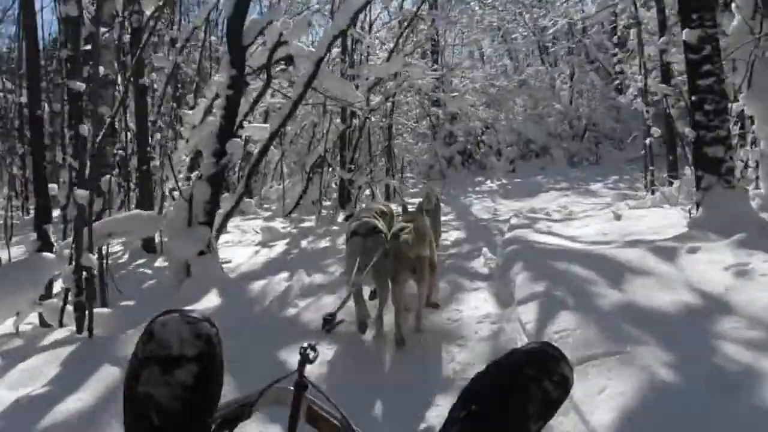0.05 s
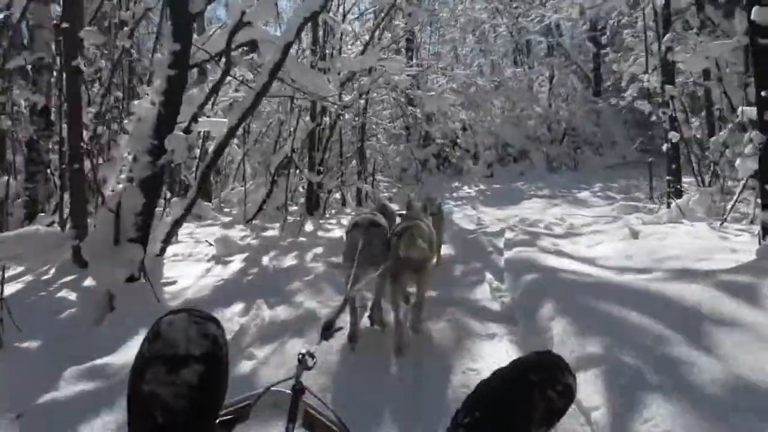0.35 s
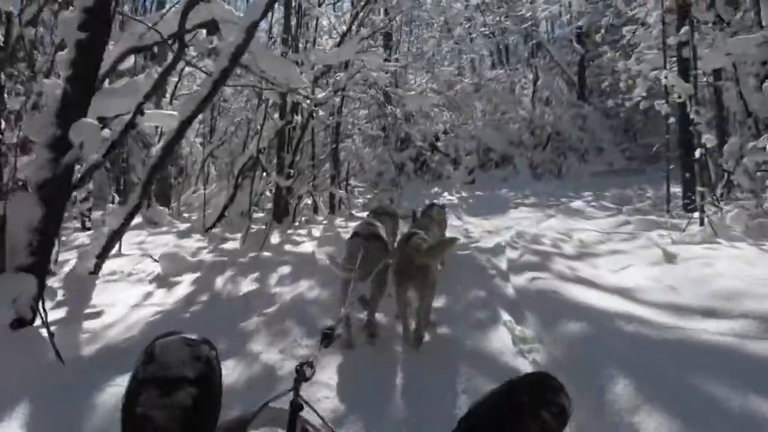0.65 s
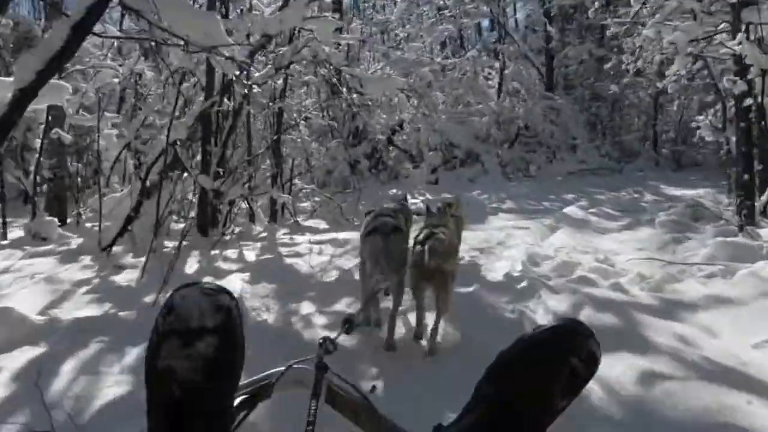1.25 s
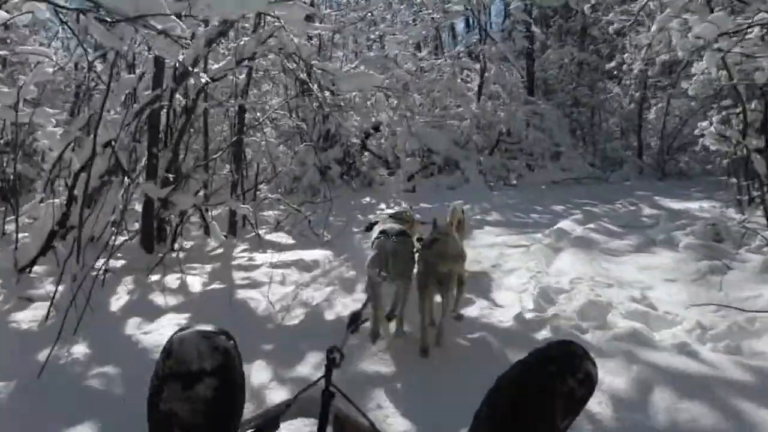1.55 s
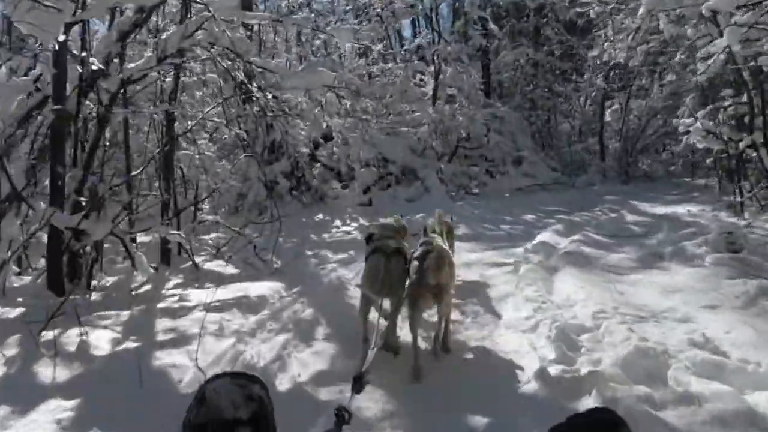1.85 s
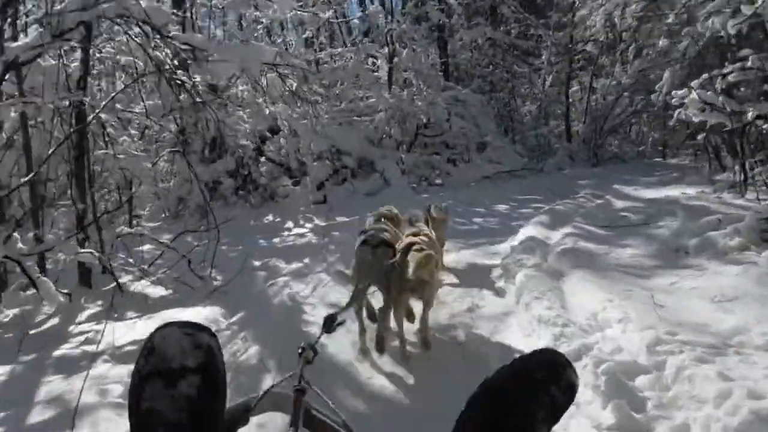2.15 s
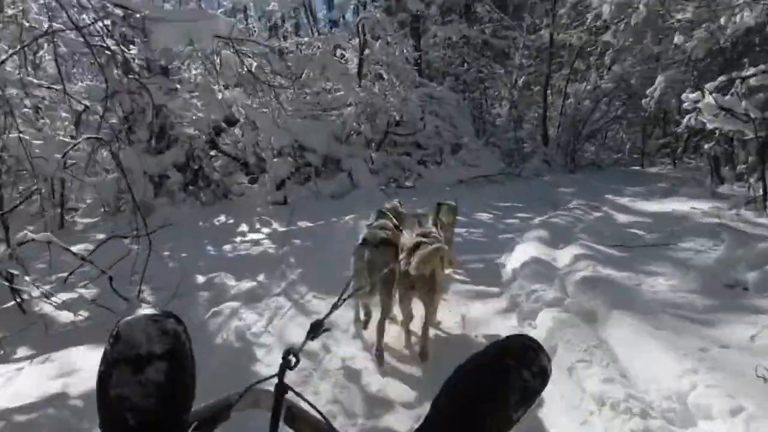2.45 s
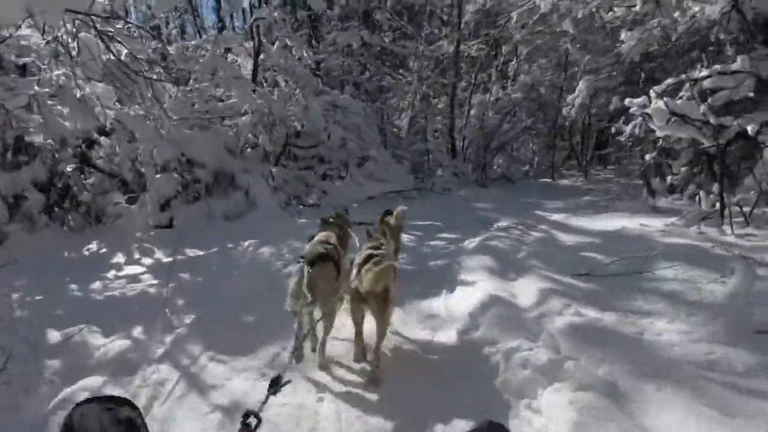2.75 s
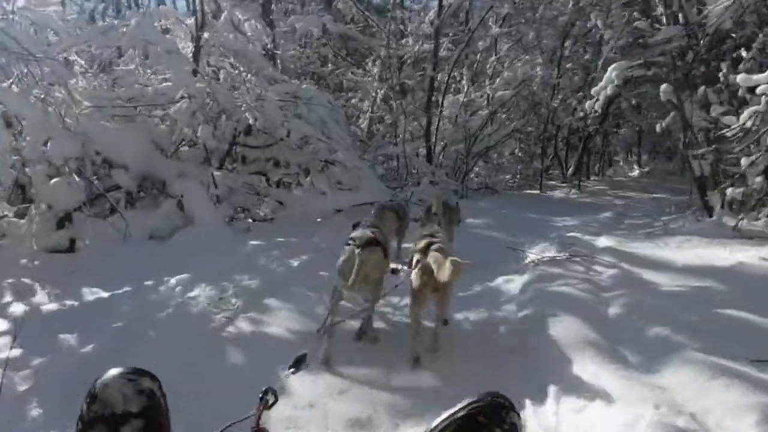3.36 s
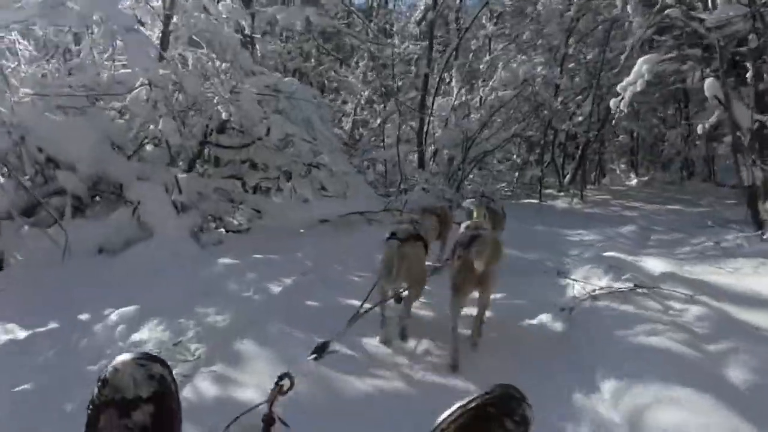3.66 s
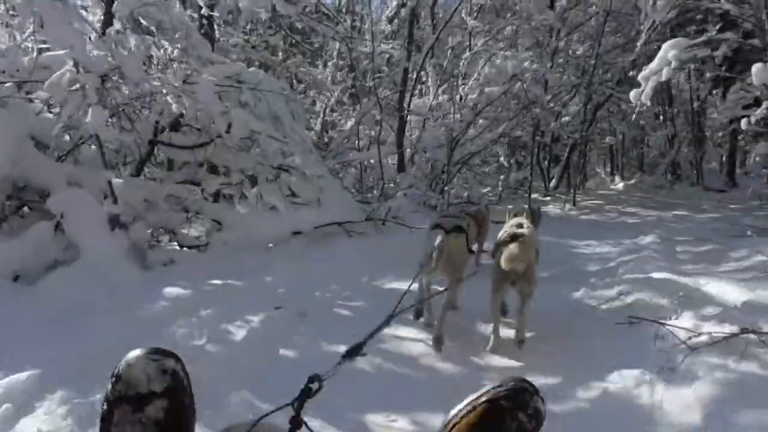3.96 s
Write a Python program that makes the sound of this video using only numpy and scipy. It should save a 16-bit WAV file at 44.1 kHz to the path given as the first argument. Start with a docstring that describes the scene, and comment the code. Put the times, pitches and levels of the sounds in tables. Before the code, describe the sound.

A sled hisses and crunches over snow, its frame knocking and rattling over bumps.

```python
"""A dog sled runs along a snowy forest trail, heard close up from a camera riding on it.
The runners hiss, crunch and faintly squeak in the snow just below. The frame knocks and judders over
the bumps, and a metal clip on the tow line clinks. Low jolts and rumble of the ride reach the
microphone, and the hardest knocks overload it."""
import sys
import numpy as np
from scipy import signal
from scipy.fft import rfft, irfft
from scipy.io import wavfile
from scipy.ndimage import uniform_filter1d

SR = 44100
rng = np.random.default_rng(int(sys.argv[2]) if len(sys.argv) > 2 else 0)


def store_pcm(level_fs):
    """Save levels as 16-bit WAV."""
    pcm = np.round(np.clip(level_fs, -1, 1) * 32767).astype(np.int16)
    wavfile.write(sys.argv[1], SR, np.atleast_2d(pcm).T)


N = 176400
TIME = np.arange(N) / SR

# Pressure of the runners on the snow. Each row: time in seconds, hiss in dB, scrape in dB.
RUNNER_PRESSURE = [(0, -20.5, -29), (0.17, -20.5, -30.5), (0.24, -20.5, -35.5), (0.38, -22.5, -33),
                   (0.53, -23, -33.5), (0.61, -24, -32.5), (0.68, -19.5, -29.9), (0.75, -19.5, -29.2),
                   (0.87, -21.5, -30), (0.95, -21.5, -26.5), (1.1, -22.5, -29.5), (1.19, -19.5, -28.5),
                   (1.28, -22.5, -28.5), (1.405, -19, -44), (1.44, -29, -34), (1.47, -26.5, -32),
                   (1.51, -20.5, -30.6), (1.545, -18.5, -28.8), (1.585, -26, -32), (1.61, -17.6, -21),
                   (1.645, -26.2, -31.5), (1.695, -19.5, -35.5), (1.735, -10.5, -25), (1.83, -12, -19),
                   (1.875, -20.5, -25), (1.92, -16, -26.5), (1.98, -18, -27.5), (2.1, -14.5, -22.5),
                   (2.19, -18.2, -27), (2.3, -16.7, -21.5), (2.4, -19, -31), (2.45, -22.5, -36.5),
                   (2.55, -25.5, -31), (2.6, -27.5, -35), (2.645, -24.5, -38), (2.675, -26.5, -34),
                   (2.71, -18, -30.7), (2.735, -26.5, -31), (2.77, -12, -26), (2.825, -16.3, -24.9),
                   (2.86, -19.5, -29.4), (2.91, -19.6, -28), (2.98, -18.5, -28), (3.1, -19.5, -30),
                   (3.18, -20.5, -28.5), (3.29, -24.5, -35.5), (3.35, -23.7, -31), (3.44, -22.0, -25.5),
                   (3.51, -21.5, -26), (3.55, -25, -31.5), (3.68, -24.5, -32.5), (3.72, -25.5, -34.5),
                   (3.86, -25.0, -31), (3.92, -22.5, -29.5), (4.0, -19, -26)]
# Rumble at the microphone. Each row: time in seconds, level in dB.
RUMBLE_LEVELS = [(0, -39), (0.06, -32.9), (0.12, -40), (0.35, -42.7), (0.6, -48), (0.75, -34.0),
                 (1.08, -36.5), (1.25, -29), (1.38, -41), (1.6, -30), (1.7, -36), (1.8, -29.4), (1.95, -29),
                 (2.3, -33.5), (2.55, -39.5), (2.7, -35), (2.8, -30), (2.93, -25), (3.0, -34.5), (3.1, -32),
                 (3.2, -37.5), (3.47, -34), (3.6, -48), (3.66, -28), (3.8, -31), (4.0, -24.5)]
# Soft jolts of the sled. Each row: crest time in seconds, level in dB, pitch in Hz.
SLED_JOLTS = [(0.039, -25, 80), (.665, -17.5, 79), (1.126, -16.5, 110), (1.179, -3, 157), (1.246, -13, 156),
              (1.46, -18, 202), (1.575, -16, 150), (1.632, -7.5, 66), (1.641, -2, 135), (1.912, -11, 113),
              (2.21, -13.5, 210), (2.254, -17.5, 209), (2.635, -8, 120), (2.743, -11.5, 192),
              (2.934, -17.5, 99), (3.111, -15, 198), (3.646, -19, 100), (3.685, -19.5, 91),
              (3.718, -12, 119), (3.741, -15, 190), (3.964, -13.5, 75)]
# Knocks of the frame. Each row: start in seconds, level in dB, contact in seconds, extra body in dB.
FRAME_KNOCKS = [(0.05, -14.5, 0.0072, 0), (0.079, -21, 0.0019, -1), (0.105, -14, 0.0055, -5),
                (0.154, -11, 0.007, -7), (0.163, -12.5, 0.003, -1), (0.198, -15.5, 0.0048, 0),
                (0.26, -0.5, 0.0035, -3), (0.267, -6.5, 0.0033, -3), (0.2755, -6, 0.0026, 6),
                (0.291, -10, 0.0039, 4.5), (0.304, -28, 0.0023, -8), (0.3235, -4.5, 0.0034, 4.5),
                (0.346, -14.5, 0.0045, -5), (0.407, -16, 0.0028, -6), (0.566, -22, 0.0029, 2),
                (0.622, -20, 0.0076, -4), (0.6365, -6.5, 0.0044, -2.5), (0.649, -9.5, 0.0027, -8),
                (0.722, -4, 0.002, 3), (0.736, -14, 0.0091, 1), (0.892, -16, 0.0037, 0),
                (0.91, -9, 0.0021, 2), (0.975, -9, 0.0026, 9), (1.004, -17.5, 0.0036, 3),
                (1.075, -14, 0.0032, -3), (1.164, -11.5, 0.0037, -11), (1.17, -12, 0.0043, 1),
                (1.242, -10.5, 0.004, -7), (1.325, -13, 0.0028, -14), (1.403, -26, 0.0039, -20),
                (1.414, -10.5, 0.0043, -3), (1.5205, 1.5, 0.0024, -3.5), (1.563, -10, 0.0015, 1),
                (1.572, -11, 0.0029, -6), (1.5905, -1, 0.0029, -1.5), (1.606, -13, 0.0022, -2),
                (1.621, -5.5, 0.0014, -14), (1.716, -10, 0.0031, 2), (1.83, 3, 0.0039, 4.5),
                (1.847, -11, 0.0026, -3), (1.861, -6, 0.003, -8), (1.8925, 5, 0.0051, 2),
                (1.95, -3.5, 0.0043, -17), (1.958, -6.5, 0.0031, -7), (1.995, -8.5, 0.0022, -15),
                (2.036, -12, 0.003, -3), (2.083, -9.5, 0.0023, 1), (2.098, -7, 0.0027, 4),
                (2.135, -11.5, 0.0037, 0), (2.214, -12, 0.0022, -10), (2.273, -8, 0.0032, 6),
                (2.358, -10, 0.0032, 2), (2.3665, -6, 0.005, 7.5), (2.397, -9, 0.0033, 2),
                (2.4155, -5.5, 0.0046, 9.5), (2.424, -11, 0.0039, -14), (2.465, -15, 0.0023, -2),
                (2.492, -13.5, 0.003, -2), (2.521, -11.5, 0.0026, -12), (2.546, -12, 0.0022, -11),
                (2.56, -5, 0.0049, 9.5), (2.613, -10.5, 0.003, -5), (2.742, -10, 0.0071, -14),
                (2.7535, 0.5, 0.0037, 4), (2.779, 0, 0.0026, 0.5), (2.851, -10.5, 0.0027, -6),
                (2.89, -11, 0.0071, 2.5), (2.932, -10.5, 0.0059, 0.5), (3.01, -11.5, 0.0058, 9.5),
                (3.053, -11, 0.0062, 3.5), (3.065, 0.5, 0.0034, 6), (3.078, -4, 0.0066, -1),
                (3.216, -12, 0.0022, -11), (3.243, -25, 0.0036, -10), (3.27, -12, 0.0041, -11),
                (3.3, -11.5, 0.0032, -6), (3.37, -5, 0.0044, 7), (3.412, -11.5, 0.002, -21),
                (3.4705, -1.5, 0.0027, 3), (3.49, -13, 0.0018, 1), (3.56, -15.5, 0.0025, -1),
                (3.642, -14, 0.0017, -12), (3.672, -20, 0.0036, -13), (3.742, -15, 0.0048, -0.5),
                (3.814, -21, 0.0028, 0), (3.835, -12, 0.0017, -21), (3.899, -25, 0.0044, 16.5),
                (3.921, -15, 0.0046, 1)]
# Chatter over hard ridges. Each row: start and length in seconds, level in dB, extra body in dB.
FRAME_JUDDERS = [(1.74, .012, -3, 1), (1.752, .03, 2, 5), (1.7853, .036, 1.5, 3), (2.305, .036, -3.5, 8),
                 (2.7892, .02, 5.5, 0.5)]
# Clinks from the tow line. Each row: start in seconds, level in dB.
TOW_CLINKS = [(.637, -3.5), (.650, -8), (1.165, -17), (1.6215, -6), (1.995, -13), (2.7425, -11),
              (3.300, -22), (3.835, -20)]
# Modes of its metal clip. Each row: nominal pitch in Hz, level in dB, seconds to fade by 60 dB.
METAL_MODES = [(2730, -5, 0.026), (4650, -5, 0.045), (5220, 3, 0.027), (6030, 5, 0.018), (7250, -10, 0.02)]
# Squeaks on packed snow. Each row: start and length in seconds, pitch in Hz, level in dB, wobble in Hz.
SNOW_SQUEAKS = [(0.802, 0.064, 3420, -20.5, 230), (1.127, 0.027, 3780, -21, 200),
                (1.172, 0.057, 2750, -19, 400), (1.371, 0.019, 3200, -16, 80),
                (1.386, .018, 4210, -15, 200)]
# Tone of each layer at the microphone. Each row: frequency in Hz, relative level in dB.
HISS_SPECTRUM = [(200, -20.5), (1000, -14), (2500, -4.5), (4000, -0.5), (6200, 1), (7300, -2.5),
                 (9000, -6.5), (10500, -11.5), (12500, -23.5), (15500, -46.5)]
SCRAPE_SPECTRUM = [(100, -9.5), (300, -4), (550, -2.5), (900, 0.5), (1500, 1), (2300, -2.5), (3500, -3),
                   (7000, -34), (15000, -45)]
RUMBLE_SPECTRUM = [(10, -9), (25, 9.5), (45, 3.5), (62, 4), (110, 0), (200, -4.5), (350, -15.5), (800, -31),
                   (3000, -57)]
KNOCK_SPECTRUM = [(80, -18.5), (400, -9.5), (900, -9), (1600, -5.5), (3000, 0), (4500, 0), (6000, 0.5),
                  (7500, -3.5), (10000, -9), (12500, -21.5), (16000, -60)]
# Resonances of frame and camera housing. Each row: centre and width in Hz, lift in dB at body=1.
BODY_RESONANCES = [(755, 56, 5), (1070, 60, 1), (1475, 84, 4), (1638, 53, 3), (2040, 96, 2), (2130, 70, 2),
                   (2200, 60, 2), (2570, 73, 3), (3320, 70, 6.5), (3360, 120, -2), (4360, 140, 5),
                   (5370, 84, 2.5), (5770, 120, 5.5), (6400, 760, 1), (7830, 61, -4), (8780, 260, 1)]

HISS_DB, SCRAPE_DB, RUMBLE_DB, KNOCK_DB = -1, -2, -1, -1.3
CRUNCH_PER_S, CRUNCH_DB, CRUNCH_SPREAD_DB, CRUNCH_S = 120, -4, 1.5, 0.0027
JOLT_DECAY_CYCLES, JOLT_ROUGHNESS = 0.4, 0.2
JUDDER_GAP_S, JUDDER_CONTACT_S = 0.0079, 0.0026
ATTACK_S, RELEASE_S, SNAP_DB, SNAP_S = 0.00058, 0.0018, -2, 0.0011
RING_DB, RING_RISE_S, RING_S = -8, 0.0054, 0.0067
BODY_HZ, BODY_OCTAVES, TINT_DB, TINT_STEP_HZ = 1550, 0.85, 2, 451.5
SQUEAK_RISE, SQUEAK_OCTAVE_DB = 0.037, -6
CEILING, BAND_EDGE_HZ = 0.81, 15900


def amp(db):
    """Decibels to gain."""
    return 10 ** (np.asarray(db) / 20)


def unit(x):
    """Scales to rms 1."""
    return x / np.sqrt(np.mean(x ** 2) + 1e-20)


def add(mix, start, sound):
    """Mixes a sound in at a time in seconds."""
    part = mix[max(round(start * SR), 0):][:len(sound)]
    part += sound[:len(part)]


def colour(x, spectrum, body=0):
    """Causal filter of unit energy: a smooth spectrum plus a share of the body resonances."""
    size = 8192
    hz = np.abs(np.fft.fftfreq(size, 1 / SR))
    point_hz, point_db = np.transpose(spectrum)
    lifts = sum(lift / (1 + (2 * (hz - centre) / width) ** 2) for centre, width, lift in BODY_RESONANCES)
    db = np.interp(np.log(hz + 1), np.log(point_hz), point_db) + body * lifts
    minimum_phase = np.exp(np.conj(signal.hilbert(np.log(amp(db)))))
    taps = np.fft.ifft(minimum_phase).real[:size // 2]
    return signal.oaconvolve(x, taps / np.linalg.norm(taps))[:len(x)]


def wander(rate_hz):
    """Smooth random drift of rms 1."""
    hz = np.fft.rfftfreq(N, 1 / SR)
    return unit(irfft(rfft(rng.standard_normal(N)) * np.exp(-(hz / rate_hz) ** 2), N))


def snow_noise(patchy_db):
    """Noise whose colour shifts from moment to moment, as the snow changes under the runners."""
    cells = signal.stft(rng.standard_normal(N), nperseg=512)[2]
    bands = uniform_filter1d(rng.standard_normal(cells.shape), size=7, axis=0)
    patches = unit(uniform_filter1d(bands, size=5, axis=1))
    return unit(signal.istft(cells * amp(patchy_db * patches))[1][:N])


def runners():
    """Just below the microphone, fine snow hisses, crust crunches, and the frame carries the scrape."""
    times, hiss_db, scrape_db = np.transpose(RUNNER_PRESSURE)
    breaks = rng.random(N) < CRUNCH_PER_S / SR
    grains = breaks * amp(CRUNCH_SPREAD_DB * np.minimum(rng.exponential(1, N), 3))
    crunch = unit(np.sqrt(signal.lfilter([1], [1, -np.exp(-1 / (CRUNCH_S * SR))], grains ** 2)))
    grip = np.hypot(1, amp(CRUNCH_DB) * crunch) * amp(0.43 * wander(rate_hz=72))
    hiss = colour(grip * snow_noise(patchy_db=2), HISS_SPECTRUM, body=0.17)
    hiss *= amp(HISS_DB + np.interp(TIME, times, hiss_db))
    scrape = colour(grip * snow_noise(patchy_db=3), SCRAPE_SPECTRUM, body=0.34)
    scrape *= amp(SCRAPE_DB + np.interp(TIME, times, scrape_db))
    return hiss + scrape


def ride_rumble():
    """The ride reaches the microphone as a lumpy rumble, with a short, dull push at each jolt."""
    lumpy_noise = rng.standard_normal(N) * amp(2.86 * wander(rate_hz=23))
    out = colour(lumpy_noise, RUMBLE_SPECTRUM)
    out *= amp(RUMBLE_DB + np.interp(TIME, *np.transpose(RUMBLE_LEVELS)))
    t = TIME[:SR // 10] - 1 / 20  # centred on the crest
    for crest, db, hz in SLED_JOLTS:
        swing = JOLT_ROUGHNESS * wander(rate_hz=300)[:len(t)] - np.sin(2 * np.pi * hz * t)
        push = amp(db) * np.exp(-abs(hz * t) / JOLT_DECAY_CYCLES) * swing
        out += np.interp(TIME - crest, t, push, left=0, right=0)
    return out


def frame_knocks():
    """Each blow, close up, is a sharp snap and a gritty contact that ring briefly in the frame."""
    blows = list(FRAME_KNOCKS)
    for start, length, db, body_db in FRAME_JUDDERS:  # a judder is a quick run of blows
        for beat in np.arange(start, start + length, JUDDER_GAP_S):
            onset = beat + 0.00035 * rng.standard_normal()
            blows.append((onset, db + rng.standard_normal(), JUDDER_CONTACT_S, body_db))
    out, t = np.zeros(N), TIME[:2048]
    hz, tint_hz = np.fft.rfftfreq(len(t), 1 / SR), np.arange(0, SR / 2, TINT_STEP_HZ)
    body_band = np.exp(-(np.log2((hz + 1) / BODY_HZ) / BODY_OCTAVES) ** 2)
    for start, db, contact_s, body_db in blows:
        grit, ring_noise, noise = rng.standard_normal((3, len(t)))
        contact = grit * np.minimum(t / ATTACK_S, 1) * np.exp(-np.maximum(t - contact_s, 0) / RELEASE_S)
        snap = amp(SNAP_DB) * np.diff(noise, prepend=0) * np.exp(-t / SNAP_S)
        ring = unit(irfft(rfft(ring_noise) * (body_band + 0.18)))
        ring *= amp(RING_DB) * np.minimum(t / RING_RISE_S, 1) * np.exp(-t / RING_S)
        # Each blow lands elsewhere and has its own colour.
        tint = unit(amp(TINT_DB * np.interp(hz, tint_hz, noise[-len(tint_hz):])))
        blow = irfft(rfft(contact + snap + ring) * amp(body_db * body_band) * tint)
        add(out, start, amp(db) * blow)
    return amp(KNOCK_DB) * colour(out, KNOCK_SPECTRUM, body=1.26)


def tow_line_clinks():
    """A gritty tap rings the small metal clip on the tow line, a little differently each time."""
    out, t = np.zeros(N), TIME[:SR // 20]
    for start, db in TOW_CLINKS:
        ring = np.zeros(len(t))
        for hz, mode_db, t60 in METAL_MODES:
            cycles = hz * rng.uniform(0.87, 1.02) * t + rng.random()
            ring += amp(mode_db - 60 * t / t60) * np.sin(2 * np.pi * cycles)
        tap = rng.standard_normal(len(t)) * np.exp(-t / 0.00076)
        add(out, start, amp(db) * (0.62 * ring + 0.22 * tap))
    return out


def snow_squeaks():
    """Snow sticks and slips under the runners: a fuzzy, slightly rising whistle and its octave."""
    out = np.zeros(N)
    for start, length, hz, db, wobble_hz in SNOW_SQUEAKS:
        t = np.arange(0, length, 1 / SR)
        pitch = hz * (1 + SQUEAK_RISE * (t / length - 0.5)) + wobble_hz * wander(rate_hz=790)[:len(t)]
        phase = 2 * np.pi * np.cumsum(pitch) / SR
        tone = np.sin(phase) + amp(SQUEAK_OCTAVE_DB) * np.sin(2 * phase)
        flutter = amp(3 * wander(rate_hz=410)[:len(t)])
        add(out, start, amp(db) * unit(tone * flutter) * np.sin(np.pi * t / length))
    return out


def scene():
    """The moving sled, in mono at the on-board microphone."""
    return (runners() + ride_rumble() + frame_knocks() + tow_line_clinks() + snow_squeaks())[None]


def record(dry):
    """The recorder clips the hardest knocks, then limits the band."""
    clipped = np.clip(dry, -CEILING, CEILING)
    lowpass = signal.firwin(511, BAND_EDGE_HZ, window=("kaiser", 8), fs=SR)
    return signal.oaconvolve(clipped, lowpass[None], "same")


dry = scene()
out = record(dry)
store_pcm(out)
```